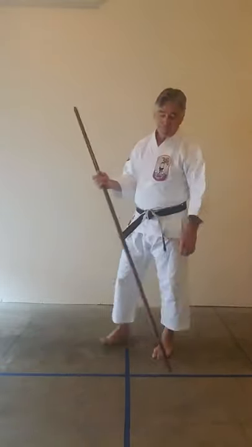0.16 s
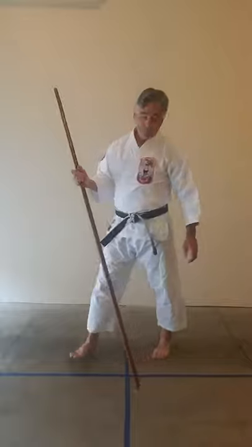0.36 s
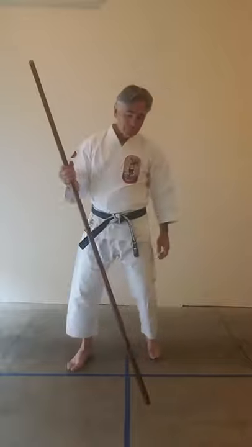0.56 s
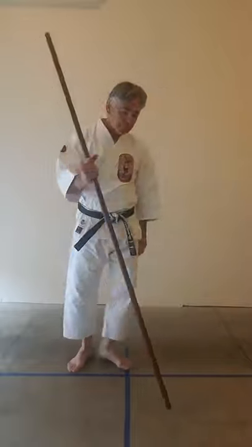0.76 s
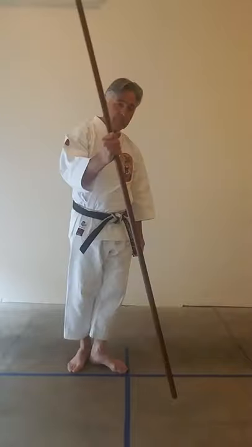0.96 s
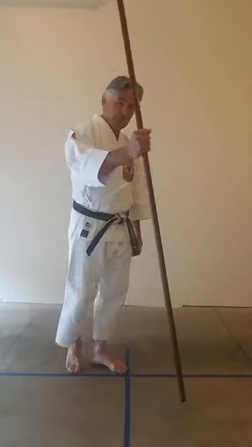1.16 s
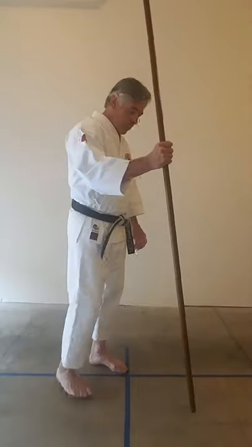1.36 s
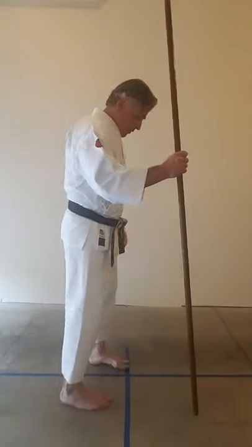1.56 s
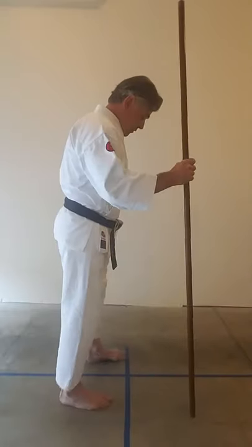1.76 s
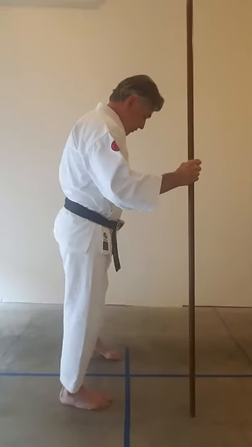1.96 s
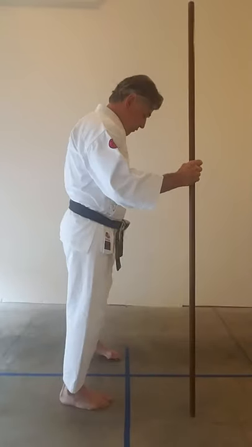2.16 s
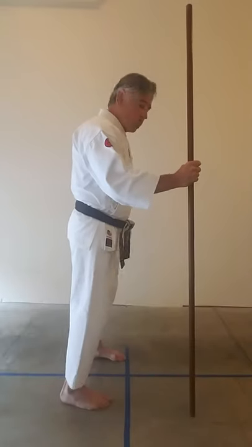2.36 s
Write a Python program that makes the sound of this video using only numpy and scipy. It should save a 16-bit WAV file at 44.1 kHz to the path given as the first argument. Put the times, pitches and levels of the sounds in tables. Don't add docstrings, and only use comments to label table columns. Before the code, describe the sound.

A wooden staff end strikes concrete once, a loud hard clack with short ring, after quiet bare feet pats, gritty scuffs and cloth rustle; bare reverberant garage, close phone stereo microphones, faint room hum.

```python
import sys
import numpy as np
from scipy import signal
from scipy.fft import rfft, irfft, next_fast_len
from scipy.io import wavfile
from scipy.ndimage import map_coordinates

SR = 44100
rng = np.random.default_rng(int(sys.argv[2]) if len(sys.argv) > 2 else 0)


def master(y):
    cut = np.clip(np.atleast_2d(y).T, -1, 1)
    pcm = np.round(cut * 32767)
    wavfile.write(sys.argv[1], SR, pcm.astype(np.int16))


def invert_db(level):
    return 10 ** (np.asarray(level, dtype=float) / 20)


N = 105928
TIME_S = np.arange(N) / SR


def unit(x):
    return x / np.sqrt(np.mean(x ** 2) + 1e-20)


def along(points, hz):
    point_hz, value = np.transpose(points)
    return np.interp(np.log(hz + 1), np.log(point_hz + 1), value)


def filtered(x, response):
    size = next_fast_len(x.shape[-1] + SR // 2)
    spectrum = rfft(x, size) * response(np.fft.rfftfreq(size, 1 / SR))
    return irfft(spectrum, size)[..., :x.shape[-1]]


def causal(gain):
    cepstrum = irfft(np.log(gain + 1e-6))
    half = len(cepstrum) // 2
    cepstrum[1:half] *= 2
    cepstrum[half + 1:] = 0
    return np.exp(rfft(cepstrum))


def resonance(f, hz, width_hz):
    damping = 1j * f * width_hz
    return damping / (hz * hz - f * f + damping + 1e-9)


def wobble(rate_hz):
    knots = rng.standard_normal(int(N * rate_hz / SR) + 4)
    return map_coordinates(knots, [np.arange(N) * rate_hz / SR])


def since(start_s):
    return np.maximum(TIME_S - start_s, 0)


# freq_hz, correlation [-1..1]
PORT_LIKENESS = [(60, 0.85), (130, 1), (300, 0.67), (640, 0.35), (1400, -0.046), (3000, -0.016),
                 (8000, -0.098)]


def diffuse_pair(x):
    def mid_side(hz):
        angle = np.arccos(np.clip(along(PORT_LIKENESS, hz), -1, 1)) / 2
        return np.array([np.cos(angle), np.sin(angle)])

    mid, side = filtered(x, mid_side)
    return np.array([mid + side, mid - side])


# freq_hz, t60_s
ROOM_DECAY = [(80, 0.68), (200, 0.48), (1000, 0.9), (3000, 0.59), (8000, 0.78), (15000, 0.55)]


def room(x, wet_db):
    bloom_s, lag_s = 0.0068, 0.000182
    bounce_s, bounce_db = (.00095, .0007), (-2, -7)
    hz, t, z = signal.stft(diffuse_pair(rng.standard_normal((2, SR))), SR, nperseg=128)
    decay = invert_db(-60 * t / along(ROOM_DECAY, hz)[:, None])
    tail = signal.istft(z * decay, SR, nperseg=128)[1][:, :SR]
    tail = tail * (1 - np.exp(-(np.arange(SR) / SR / bloom_s) ** 2))
    wet = signal.fftconvolve(x[None], tail / np.linalg.norm(tail[0]), axes=1)[:, :N]
    direct = filtered(x, lambda f: np.exp(-1j * np.pi * f * lag_s * np.array([[1], [-1]])))
    bounce_gain = invert_db(bounce_db)[:, None]
    near = filtered(x, lambda f: bounce_gain * np.exp(-2j * np.pi * np.outer(bounce_s, f)))
    return direct + near + invert_db(wet_db) * wet


# freq_hz, density_db [dB per Hz]
AIR_COLOUR = [(25, -30), (60, -10), (120, -2.5), (250, -12.5), (700, -19.5), (2500, -28), (7000, -38.5),
              (16000, -32)]


def air():
    air_db, hum_db, hum_hz, hum_width_hz = -57, -66.5, 124.4, 5
    tone = diffuse_pair(rng.standard_normal((2, N)))
    tone = unit(filtered(tone, lambda f: invert_db(along(AIR_COLOUR, f))))
    hum = diffuse_pair(rng.standard_normal((2, N)))
    hum = unit(filtered(hum, lambda f: resonance(f, hum_hz, hum_width_hz)))
    tone_gain = invert_db(air_db + 0.23 * wobble(1.97))
    hum_gain = invert_db(hum_db + 1.35 * wobble(8.6))
    return tone_gain * tone + hum_gain * hum


# time_s, level_db
CLOTH_STIR = [
    (0.0, -61.5),
    (0.15, -67.5),
    (0.288, -63.5),
    (0.368, -65),
    (0.966, -58),
    (1.296, -69),
    (1.69, -69.5),
    (1.7, -80),
]
# freq_hz, gain_db
CLOTH_COLOUR = [(200, -29), (600, 0.5), (1500, 1), (3000, -8.5), (6000, -14), (12000, -20)]


def cloth():
    uneven_db = 1.5
    time_s, level_db = np.transpose(CLOTH_STIR)
    noise = diffuse_pair(rng.standard_normal((2, N)))
    noise = unit(filtered(noise, lambda f: invert_db(along(CLOTH_COLOUR, f))))
    return invert_db(np.interp(TIME_S, time_s, level_db) + uneven_db * wobble(18.64)) * noise


STEP_START = [.2665, .29, .612, .637, .41, .58, 1.225, 1.055, 1.31]
# level_db, pitch_hz
STEP_TONE = [
    (-44, 380),
    (-51, 364),
    (-51.5, 235),
    (-43.5, 337),
    (-61, 57),
    (-60, 23),
    (-54.5, 50),
    (-49, 130),
    (-58.5, 69),
]
# start_s, level_db, pitch_hz
SKIN_TICKS = [
    (.2665, -43, 2400),
    (.2673, -49, 1400),
    (.641, -49, 1300),
    (1.212, -56, 12000),
]


def steps():
    wet_db, tick_cycles = 2.5, 1.6
    out = np.zeros(N)
    for start_s, (level_db, pitch_hz) in zip(STEP_START, STEP_TONE):
        t = since(start_s)
        swing = np.sin(2 * np.pi * pitch_hz * t) * np.exp(-2.5 * pitch_hz * t)
        out += invert_db(level_db) * 8 * pitch_hz * t * swing
    for start_s, level_db, pitch_hz in SKIN_TICKS:
        t = since(start_s)
        out += invert_db(level_db) * np.sin(2 * np.pi * pitch_hz * t) * np.exp(-t * pitch_hz / tick_cycles)
    return room(out, wet_db)


# start_s, level_db, rise_s, hold_s, bright_db [dB per octave]
SCUFFS = [
    (.0, -65.5, 0.0034, 0.016, 8.5),
    (0.448, -62, 0.017, 0.13, 10.5),
    (0.785, -51, 0.039, 0.041, 8.5),
    (0.976, -56, 0.018, 0.052, 9),
    (1.073, -68.5, 0.023, 0.11, 4.5),
    (1.194, -57, .004, 0.016, 17),
    (1.484, -57, 0.02, 0.033, 6.5),
    (1.653, -53, 0.0062, 0.005, 8),
    (1.678, -60.5, 0.019, 0.036, 14.5),
]
# freq_hz, gain_db
SOLE_COLOUR = [(300, 3), (1000, 5), (2500, 11.5), (6000, -3), (12000, -6), (16000, -10)]


def scuffs():
    grains_per_s, spread_db, fall_s, wet_db = 12000, 1.4, .022, 3
    out = np.zeros(N)
    for start_s, level_db, rise_s, hold_s, bright_db in SCUFFS:
        grains = (rng.random(N) < grains_per_s / SR) * rng.standard_normal(N)
        grains = grains * invert_db(spread_db * rng.exponential(size=N))
        tilt = lambda f: bright_db * np.log2(f / 6000 + 0.013)
        grit = unit(filtered(grains, lambda f: invert_db(along(SOLE_COLOUR, f) + tilt(f))))
        rise = np.clip((TIME_S - start_s) / rise_s, 0, 1)
        fall = np.exp(-since(start_s + rise_s + hold_s) / fall_s)
        out += invert_db(level_db) * rise * fall * grit
    return room(out, wet_db)


# pitch_hz, width_hz, level_db
STAFF_MODES = [(1153, 58, -2.5), (1678, 50, 6), (1941, 48, 5), (2229, 44, 5.5), (2507, 44, 10.5),
               (2823, 48, 13), (3086, 41, 13), (3450, 52, 8), (3790, 37, 5), (4400, 135, -0.5),
               (5380, 22, -1), (5680, 120, -2.5), (6360, 18, -23),
               (986, 20, -7), (1383, 145, -3.5)]
# freq_hz, gain_db
CRACK_COLOUR = [(600, -11), (1000, -5.5), (4500, 4.5), (7500, -7.5), (9000, -12), (12000, -10.5),
                (14000, -20), (16000, -48)]


def staff():
    knock_s, knock_db, wet_db = 1.7639, -13.5, 8.5
    contact_s, slab_contact_s = .00008, .00016
    thud_hz, thud_width_hz, thud_db = 371, 690, -6
    boom_hz, boom_width_hz, boom_db = 120, 41, -3
    crack_late_s, crack_db = 0.000986, -7
    t = since(knock_s)

    def bending(f):
        modes = enumerate(sorted(STAFF_MODES))
        return sum((-1) ** k * invert_db(db) * resonance(f, hz, width) for k, (hz, width, db) in modes)

    def slab(f):
        boom = invert_db(boom_db) * resonance(f, boom_hz, boom_width_hz) ** 2
        return boom + resonance(f, thud_hz, thud_width_hz) ** 3

    def late_crack(f):
        delay = np.exp(-2j * np.pi * f * (knock_s + crack_late_s))
        return delay * causal(invert_db(along(CRACK_COLOUR, f)))

    ring = filtered(t / contact_s * np.exp(1 - t / contact_s), bending)
    thud = filtered((t / slab_contact_s) ** 2 * np.exp(-t / slab_contact_s), slab)
    impulse = 1. * (np.arange(N) == 0)
    crack = -filtered(impulse, late_crack)
    knock = ring / abs(ring).max()
    knock = knock + invert_db(thud_db) * thud / abs(thud).max()
    knock = knock + invert_db(crack_db) * crack / abs(crack).max()
    return room(invert_db(knock_db) * knock, wet_db)


def scene():
    return air() + cloth() + steps() + scuffs() + staff()


def band_limit(x):
    return signal.sosfilt(signal.butter(12, 16440, fs=SR, output="sos"), x)


# freq_hz, gain_db
LEFT_PORT = [(100, 0), (3000, 1.5), (7300, 13.5), (8400, -5.5), (10000, -1.5), (11600, 10), (13000, 9),
             (15500, -14.5)]
# freq_hz, gain_db
RIGHT_PORT = [(100, 2), (1500, 2), (2800, 6.5), (4200, -0.5), (6000, 7), (7200, -2), (12500, -2),
              (16000, 2)]


def record(dry):
    top_hz, edge_hz, ceiling = 15780, 12, .5

    def ports(f):
        edge = (1 - np.tanh((f - top_hz) / edge_hz)) / 2
        return np.array([edge * causal(invert_db(along(port, f))) for port in (LEFT_PORT, RIGHT_PORT)])

    x = filtered(dry, ports)
    mix = x / (1 + abs(x / ceiling) ** 4) ** .25
    return band_limit(mix)


dry = scene()
out = record(dry)
master(out)
```